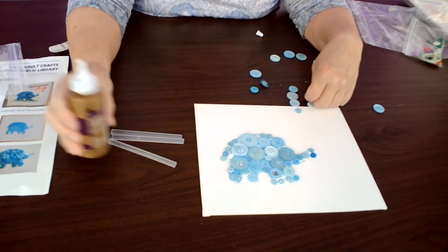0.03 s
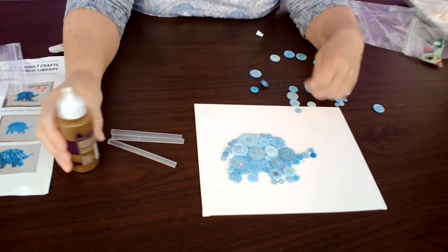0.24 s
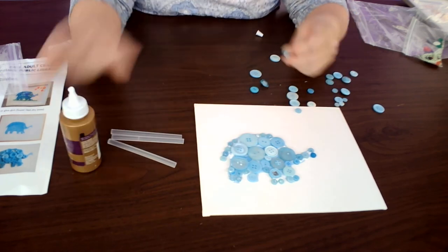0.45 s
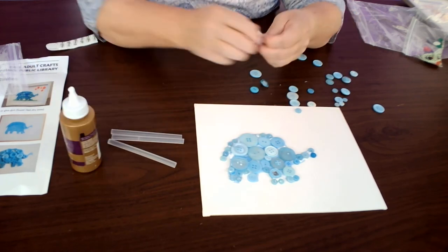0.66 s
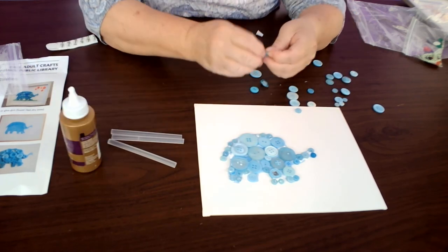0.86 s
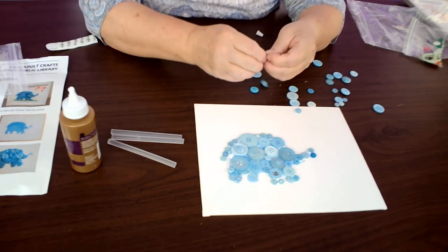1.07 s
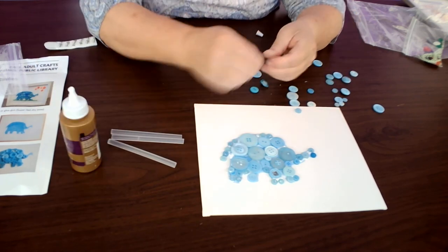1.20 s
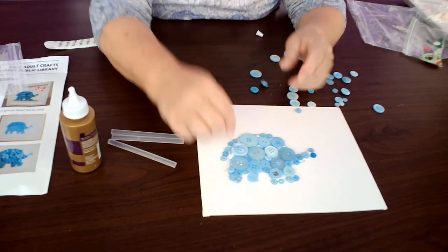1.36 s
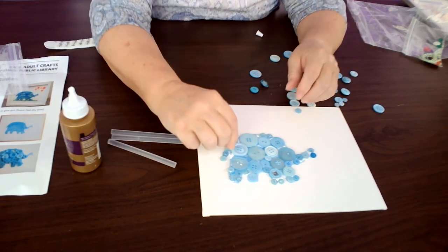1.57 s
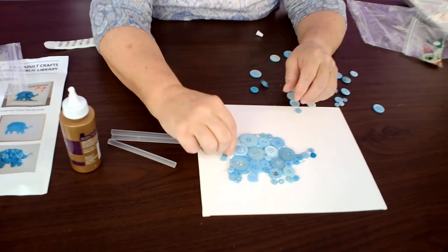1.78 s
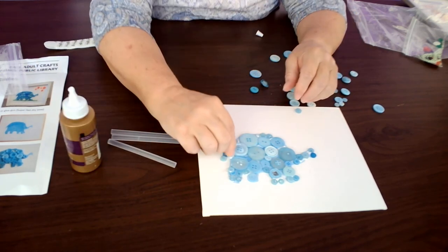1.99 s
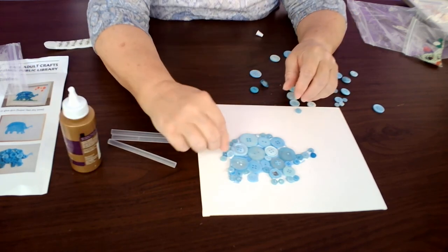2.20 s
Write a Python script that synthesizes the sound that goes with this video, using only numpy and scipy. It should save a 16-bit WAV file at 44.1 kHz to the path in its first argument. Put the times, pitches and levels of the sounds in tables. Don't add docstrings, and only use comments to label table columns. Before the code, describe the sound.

A plastic glue bottle scrapes briefly, then knocks hard on a wooden table in a small room.

```python
import sys
import numpy as np
from scipy import signal
from scipy.fft import rfft, irfft, next_fast_len
from scipy.io import wavfile
from scipy.ndimage import uniform_filter1d, map_coordinates

SR = 44100
rng = np.random.default_rng(int(sys.argv[2]) if len(sys.argv) > 2 else 0)


def put_to_file(sound):
    columns = np.atleast_2d(sound).T
    safe = np.clip(columns, -1, 1)
    whole_steps = np.round(safe * 32767)
    wavfile.write(sys.argv[1], SR, whole_steps.astype(np.int16))


def makeup_ratio(level_db):
    decades = np.asarray(level_db, float) / 20
    return 10 ** decades


N = 99225


def unit(x):
    return x / np.sqrt(np.mean(x ** 2) + 1e-20)


def along(points, hz):
    f, v = np.transpose(points)
    curve = np.interp(np.log(hz + 1), np.log(f + 1), v)
    octaves_above = np.log2(np.maximum(hz / f[-1], 1))
    return curve - 12 * octaves_above * (v[-1] < 0)


def colour(points):
    return lambda hz: makeup_ratio(along(points, hz))


def resonance(hz, width):
    return lambda f: 1 / (1 + ((f - hz) / width) ** 2)


def noise(gain):
    m = next_fast_len(N + 8192)
    spectrum = rfft(rng.standard_normal(m)) * gain(np.fft.rfftfreq(m, 1 / SR))
    return unit(irfft(spectrum, m)[:N])


def wobble(rate):
    knots = rng.standard_normal(int(N * rate / SR) + 4)
    return map_coordinates(knots, [np.arange(N) * rate / SR])


def add(track, s, sound):
    part = track[round(s * SR):][:len(sound)]
    part += sound[:len(part)]


def strokes(rows, gain, grain_db, rate):
    t = np.arange(N) / SR
    speed = sum(makeup_ratio(db) * np.exp(-((t - s) / half) ** 2) for s, half, db in rows)
    return speed * unit(noise(gain) * makeup_ratio(grain_db * wobble(rate)))


def thump(rows, modes, contact_s, spread_db):
    out, t = np.zeros(N), np.arange(SR // 2) / SR
    push = np.hanning(round(contact_s * SR))
    push = push / push.sum()
    for s, db in rows:
        ring = np.zeros(len(t))
        for hz, level, t60 in modes:
            start_db = level + spread_db * rng.standard_normal()
            ring += makeup_ratio(start_db - 60 * t / t60) * np.sin(2 * np.pi * hz * t)
        add(out, s, -makeup_ratio(db) * np.convolve(ring, push))
    return signal.sosfilt(signal.butter(3, 176, "high", fs=SR, output="sos"), out)


# frequency [Hz], level [dB], t60 [s]
TABLE_MODES = [(138, -8, 0.043), (214, -0.5, 0.033), (346, -3, 0.026), (436, -6, 0.01), (525, 2, 0.018),
               (712, -16, 0.015), (880, -10.5, 0.0088), (1220, -5.5, 0.014), (1350, -7, 0.014),
               (1760, -47, 0.014), (2350, -60, 0.03), (3130, -35, .02)]
# start_s [s], push_db [dB], crack_db [dB]
BLOWS = [
    (.2278, -4, -16),
    (.2303, -8, -28),
    (.2342, -40, -31),
    (.2398, -30, -33),
]
# start_s [s], push_db [dB]
ROCKS = [
    (.2346, -6),
    (.2405, -17),
    (.250, -21),
    (.2773, -15),
    (.300, -24),
    (.308, -25),
    (.333, -28),
    (.346, -28),
    (.357, -28),
]


def knock():
    spread_db = .6
    pushes = [(s, push_db) for s, push_db, _ in BLOWS]
    landing = thump(pushes, TABLE_MODES, contact_s=.0007, spread_db=spread_db)
    rocking = thump(ROCKS, TABLE_MODES, contact_s=.0012, spread_db=spread_db)
    hit = landing + rocking
    return .85 * hit / abs(hit).max()


# frequency [Hz], level [dB per Hz]
CRACK_COLOUR = [(1200, -13), (2000, -0.5), (3200, -3), (5000, -15.5), (6600, -7.5), (9000, -21.5),
                (12500, -30.5), (16000, -34)]


def crack():
    t60_s, rise_s = .009, .0002
    t, burst = np.arange(N) / SR, np.zeros(N)
    for s, _, db in BLOWS:
        add(burst, s, makeup_ratio(db - 60 * t / t60_s) * (1 - np.exp(-t / rise_s)))
    return burst * noise(colour(CRACK_COLOUR))


# start_s [s], level_db [dB rms]
SLIPS = [
    (.001, -43),
    (.007, -34),
    (.022, -32.5),
    (0.039, -33),
    (.050, -61),
    (0.061, -37),
    (.075, -62),
]
# frequency [Hz], level [dB per Hz]
DRAG_COLOUR = [(130, -32), (220, 1.5), (882, -3.5), (1460, -1.5), (2530, -3.5), (5030, -16), (7020, -7.5),
               (12000, -42), (15600, -76), (22000, -120)]
# frequency [Hz], level [dB per Hz]
SLIP_COLOUR = [(350, -20), (600, 2.5), (1640, -8), (2800, 0.5), (5310, -18.5), (7090, -8), (8770, -18.5),
               (12000, -48), (15600, -71), (22000, -120)]


def scrape():
    drag_db, end_s, fade_s, slip_s = -42.5, .055, .027, .0019
    t = np.arange(N) / SR
    drag = makeup_ratio(drag_db) * np.exp(-np.maximum(t - end_s, 0) / fade_s)
    slips = sum(makeup_ratio(db) * np.exp(-((t - s) / slip_s) ** 2) for s, db in SLIPS)
    return drag * noise(colour(DRAG_COLOUR)) + slips * noise(colour(SLIP_COLOUR))


# frequency [Hz], level [dB], t60 [s]
ROOM_MODES = [(144, -21, .42), (200, -29, .4)]


def standing_waves():
    rise_s, drag_s, drag_db = .053, .0164, -20
    t, boom = np.arange(N) / SR, np.zeros(N)
    for hz, db, t60 in ROOM_MODES:
        envelope = makeup_ratio(db - 60 * t / t60) * (1 - np.exp(-t / rise_s))
        wave = envelope * np.sin(2 * np.pi * hz * t)
        add(boom, BLOWS[0][0], wave)
        add(boom, drag_s, makeup_ratio(drag_db) * wave)
    return boom


# middle_s [s], half_length_s [s], level_db [dB rms]
FINGERS = [
    (0.381, 0.016, -45.5),
    (0.503, 0.031, -67),
    (.70, 0.13, -67),
    (0.11, 0.082, -70.5),
    (2.213, 0.011, -67.5),
]
# frequency [Hz], level [dB per Hz]
SKIN_COLOUR = [(1470, -41), (2500, -9), (3750, -1), (4300, -15), (5570, 5), (8610, 3), (15500, -40)]


def fingers():
    return strokes(FINGERS, colour(SKIN_COLOUR), grain_db=0.5, rate=1700)


# middle_s [s], half_length_s [s], level_db [dB rms]
SLEEVE = [
    (1.241, 0.065, -47.5),
    (1.333, 0.1, -61.5),
    (0.501, 0.063, -55),
    (0.689, 0.18, -56.5),
    (1.436, 0.09, -60.5),
]
# frequency [Hz], width [Hz], level [dB]
WEAVE = [(323, 36, 9.5), (537, 55, -1), (864, 210, -1), (1890, 490, -5), (3250, 570, -12.5),
         (1510, 2600, -11)]
# middle_s [s], half_length_s [s], level_db [dB rms]
FIZZ = [
    (1.216, .06, -61.5),
    (1.333, 0.077, -60),
    (1.234, 0.076, -70),
]
# frequency [Hz], level [dB per Hz]
FIBRE_COLOUR = [(2650, -21), (4500, -3.5), (5480, -8), (7530, 0.5), (9570, -21.5), (15100, -27),
                (15600, -27)]


def sleeve():
    def weave(f):
        return sum(makeup_ratio(db) * resonance(hz, width)(f) for hz, width, db in WEAVE)

    rub = strokes(SLEEVE, weave, grain_db=0.5, rate=73)
    return rub + strokes(FIZZ, colour(FIBRE_COLOUR), grain_db=0.0, rate=180)


# start_s [s], strength_db [dB]
PATS = [
    (1.10, -45.5),
    (1.258, -57),
    (1.283, -41.5),
    (1.4745, -44),
    (1.491, -46),
    (1.506, -42.5),
    (2.1685, -38.5),
    (2.177, -45),
    (2.19, -44),
    (2.204, -56),
]
# frequency [Hz], level [dB], t60 [s]
HAND_MODES = [(146, -7.5, .15), (335, -9, 0.054), (432, -2.5, 0.058), (586, -4.5, 0.073), (752, -2, 0.047),
              (950, -11, 0.015)]


def landings():
    return thump(PATS, HAND_MODES, contact_s=.0008, spread_db=1.2)


# start_s [s], peak_db [dB], pitch_hz [Hz], t60 [s]
TICKS = [
    (0.3188, -45, 9600, 0.0037),
    (0.5729, -43.5, 6340, 0.013),
    (.5735, -49, 7250, 0.016),
    (2.025, -43, 6800, 0.0044),
    (2.025, -49.5, 3600, 0.0074),
    (0.486, -43.5, 1637, 0.05),
]


def buttons():
    out, t = np.zeros(N), np.arange(SR // 20) / SR
    for s, db, hz, t60 in TICKS:
        tick = np.sin(2 * np.pi * hz * t) + .1 * rng.standard_normal(len(t))
        add(out, s, makeup_ratio(db - 60 * t / t60) * tick)
    return out


# frequency [Hz], t60 [s]
ROOM_T60 = [(100, 0.78), (300, 0.22), (1000, 0.44), (4000, 0.6), (10000, 0.65)]
# frequency [Hz], level [dB]
ROOM_COLOUR = [(100, -7), (250, -3), (600, -3.5), (1300, -2.5), (2400, -8.5), (4500, -7.5), (7000, -5.5),
               (12000, -12.5)]


def room(x):
    gap_s = .009
    hz, t, z = signal.stft(rng.standard_normal(SR), SR, nperseg=256)
    decay = makeup_ratio(-60 * t / along(ROOM_T60, hz)[:, None])
    z = z * decay * makeup_ratio(along(ROOM_COLOUR, hz))[:, None]
    tail = signal.istft(z, SR, nperseg=256)[1]
    delayed = np.pad(x, (round(gap_s * SR), 0))
    return signal.fftconvolve(delayed, tail / np.linalg.norm(tail))[:N]


# frequency [Hz], level [dB per Hz]
AIR_COLOUR = [(12, -3), (20, -37.5), (32, -10.5), (85, -15.5), (247, -17.5), (482, -16.5), (733, -16.5),
              (1600, -22), (15800, -50.5)]
# time_s [s], level_db [dB]
AIR_LEVEL = [(0.0, -54.5), (0.38, -48), (0.53, -53.5), (0.96, -53.5), (1.31, -55), (1.75, -55.5),
             (2.25, -55)]


def air():
    s, db = np.transpose(AIR_LEVEL)
    level_db = np.interp(np.arange(N) / SR, s, db) - 0.5 + .8 * wobble(4.63)
    return makeup_ratio(level_db) * noise(colour(AIR_COLOUR))


# frequency [Hz], level_db [dB rms]
MOTOR = [(487, -64.5), (974, -76.5)]
# frequency [Hz], width [Hz], level_db [dB rms]
HUM = [(331, 44, -65), (488, 7.2, -64.5), (953, 36, -69), (1572, 3.5, -74), (568, 45, -66),
       (6850, 960, -75), (77.3, 10, -65.5)]


def appliance():
    drift_rad = 1.73
    out, turn = np.zeros(N), 2 * np.pi * np.arange(N) / SR
    for hz, db in MOTOR:
        out += np.sqrt(2) * makeup_ratio(db) * np.sin(hz * turn + drift_rad * wobble(3.92))
    for hz, width, db in HUM:
        out += makeup_ratio(db) * noise(resonance(hz, width))
    return out


WHINE_DB = [-79, -79, -84]


def whine():
    frame_hz, whine_hz, clock_hz = 23.92, 4985.8, 7999.5
    burst_start_s, burst_share = .8705, .64
    clock_db, clock_dip = -82, .6
    t = np.arange(N) / SR
    frame = (t - burst_start_s) * frame_hz
    on = uniform_filter1d(1. * (frame % 1 < burst_share), size=60)
    phase = 2 * np.pi * whine_hz * t + np.pi * np.floor(frame)
    bursts = on * sum(makeup_ratio(db) * np.sin((k + 1) * phase) for k, db in enumerate(WHINE_DB))
    clock = makeup_ratio(clock_db) * (1 - clock_dip * (1 - on)) * np.sin(2 * np.pi * clock_hz * t)
    return np.sqrt(2) * (bursts + clock)


def scene():
    bottle = knock() + crack() + scrape()
    near = bottle + buttons() + fingers() + sleeve() + landings()
    reverb = makeup_ratio(-13) * room(near)
    return (near + standing_waves() + reverb + air() + appliance())[None]


def band_limit(x):
    return signal.sosfilt(signal.butter(12, 16610, fs=SR, output="sos"), x)


def record(dry):
    ceiling, offset, top_hz = .707, .0055, 15750
    held = np.clip(dry + whine() + offset, -ceiling, ceiling)
    passed = np.fft.rfftfreq(N, 1 / SR) < top_hz
    mix = irfft(rfft(held) * passed, N)
    return band_limit(mix)


dry = scene()
out = record(dry)
put_to_file(out)
```